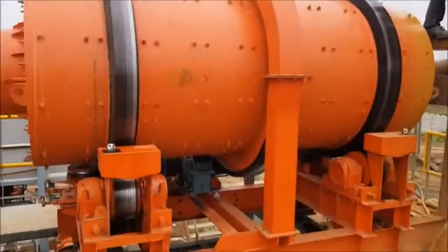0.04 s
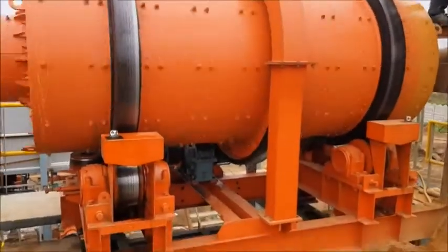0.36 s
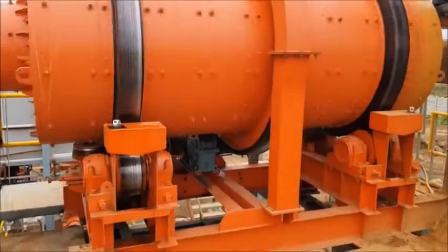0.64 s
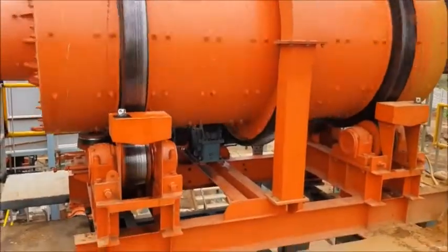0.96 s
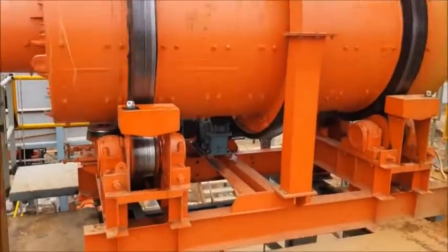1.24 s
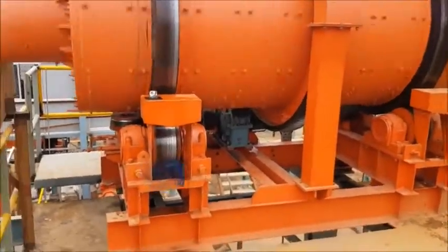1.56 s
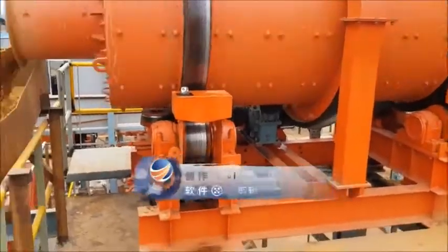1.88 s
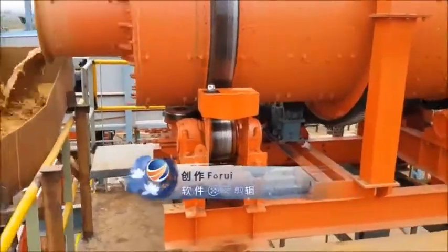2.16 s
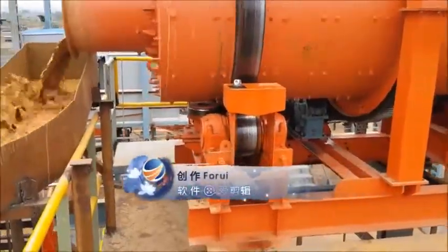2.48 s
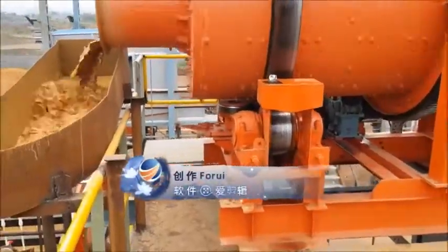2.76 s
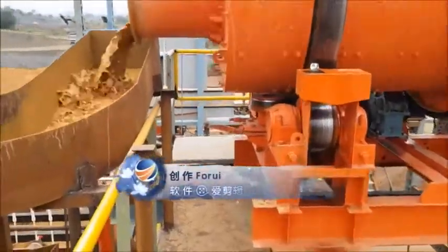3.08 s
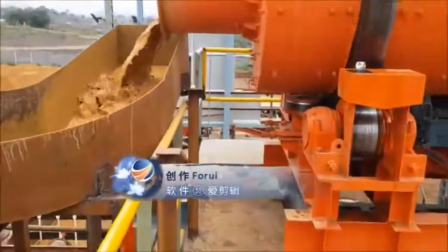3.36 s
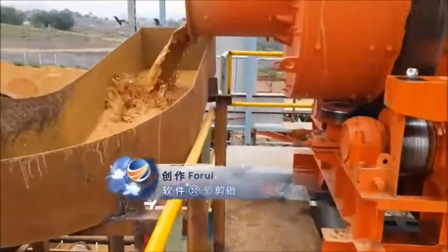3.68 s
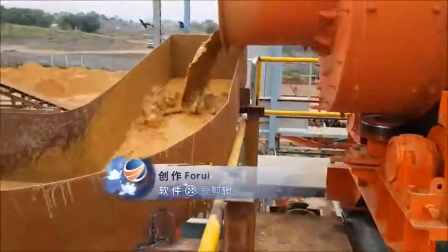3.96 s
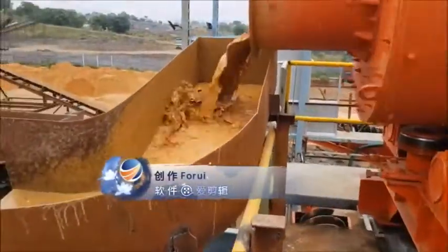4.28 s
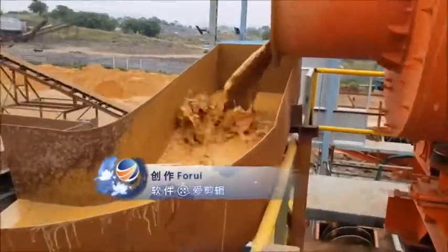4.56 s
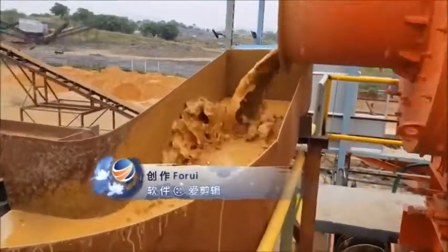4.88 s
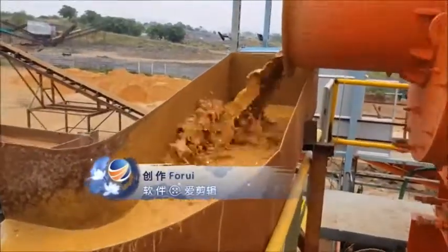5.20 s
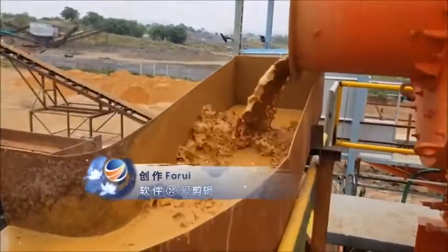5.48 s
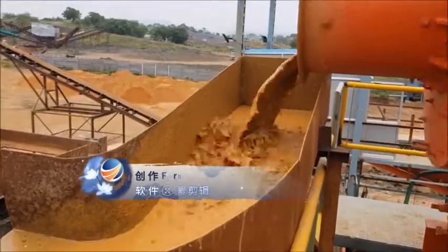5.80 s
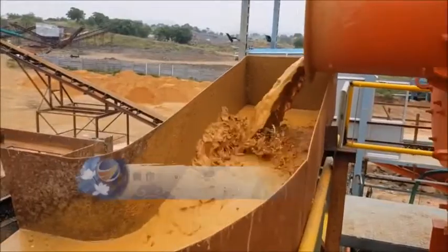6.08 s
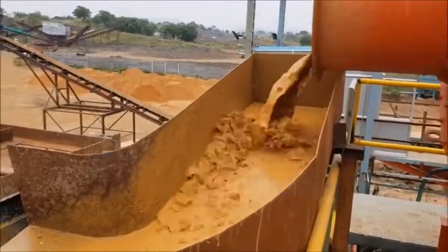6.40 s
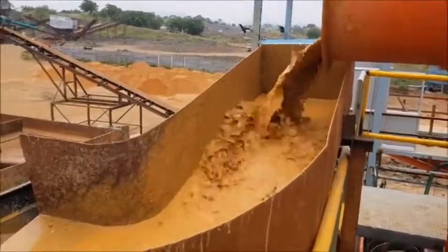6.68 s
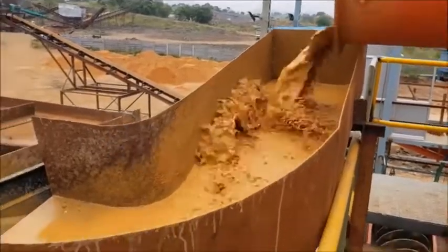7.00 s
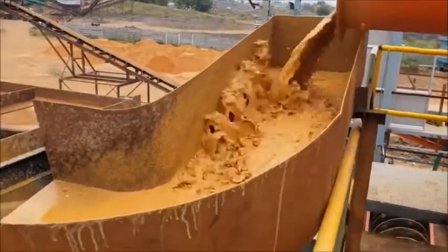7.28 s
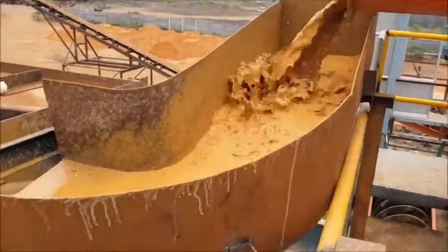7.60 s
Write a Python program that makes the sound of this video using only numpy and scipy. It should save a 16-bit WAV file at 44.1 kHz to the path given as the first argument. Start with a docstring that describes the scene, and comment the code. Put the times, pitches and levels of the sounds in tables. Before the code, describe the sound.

Outdoors at a mine, a nearby drum washer rumbles steadily as its load of stones rolls against the steel shell. Sharp knocks cluster in the first seconds, mixed with heavy thuds in clay, short showers of gravel and humming gear teeth. As the microphone turns from the machine to its outlet, the spatter and gulping slosh of pouring mud come up, while the dense roar carries on slightly to the right.

```python
"""A deep, lumpy roar with knocks: stones and wet clay tumbling in a big steel drum washer at a mine.
The load rings the shell; single stones thud in clay or strike bare steel; the ring gear's teeth hum.
Gravel slides and showers on the steel, mud sloshes, and slurry pours from the outlet into a trough.
Outdoors in light wind, the listener on a walkway turns from drum to trough: the splashing comes up."""
import sys
import numpy as np
from scipy import signal
from scipy.fft import rfft, irfft, next_fast_len
from scipy.io import wavfile
from scipy.ndimage import uniform_filter1d

SR = 44100
rng = np.random.default_rng(int(sys.argv[2]) if len(sys.argv) > 2 else 0)


def file_out(sig):
    """Save sig as 16-bit WAV at sys.argv[1]."""
    # one column per channel
    cols = np.atleast_2d(sig).T
    # limit, then scale
    lim = np.clip(cols, -1, 1)
    pcm = np.round(lim * 32767).astype(np.int16)
    wavfile.write(sys.argv[1], SR, pcm)


N = 346185
TIME_S = np.arange(N) / SR
MIC_LAG_S = 0.0005   # travel time between the two microphones


def from_db(db):
    """Decibels to gain."""
    return 10 ** (np.asarray(db) / 20)


def curves(rows):
    """One curve over time per column after t/s."""
    times_s, *columns = np.transpose(rows)
    return [np.interp(TIME_S, times_s, column) for column in columns]


def unit_rms(x):
    """Scale stereo to a mid rms of 1."""
    return x / np.sqrt(np.mean(x.mean(axis=0) ** 2) + 1e-20)


def evened(x, samples=5000):
    """Hold the running mid rms at 1."""
    power = uniform_filter1d(uniform_filter1d(x.mean(axis=0) ** 2, samples), samples // 2)
    return x / np.sqrt(np.maximum(power, 1e-20))


def drift(rate_hz):
    """Slow random wander, standard deviation 1."""
    r = np.exp(-80 * np.pi * rate_hz / SR)   # pole at SR / 40
    slow = signal.lfilter([1], [1, -2 * r, r * r], rng.standard_normal(N // 40 + 2002))[2000:]
    return np.interp(np.arange(N) / 40, np.arange(len(slow)), slow / slow.std())


def coloured(x, spectrum):
    """Filter by rows of f/Hz, level/dB; roll off past both ends."""
    size = next_fast_len(N)
    bins_hz = np.maximum(np.arange(size // 2 + 1) * SR / size, 1)
    hz, db = np.transpose(spectrum)
    gain = from_db(np.interp(np.log(bins_hz), np.log(hz), db))
    rolloff = np.minimum(1, hz[-1] / bins_hz) ** 2 * np.minimum(1, bins_hz / hz[0]) ** 2
    return irfft(rfft(x, size) * gain * rolloff, size)[:, :N]


def resonance(x, hz, width_hz):
    """Two-pole resonator, peak gain 1."""
    r = np.exp(-np.pi * width_hz / SR)
    feedback = [1, -2 * r * np.cos(2 * np.pi * hz / SR), r * r]
    return signal.lfilter(np.array([1, 0, -1]) * (1 - r * r) / 2, feedback, x + 1e-18)


def band(x, hz, width_hz):
    """Two equal resonators in series; rms 1."""
    return unit_rms(resonance(resonance(x, hz, width_hz), hz, width_hz))


def ringing(x, modes):
    """A body's modes in parallel; rms 1."""
    return unit_rms(sum(from_db(db) * resonance(x, hz, width_hz) for hz, width_hz, db in modes))


def flickering(x, depth_db, bins, frames):
    """Time-frequency patches swell and fade independently."""
    cells = signal.stft(x, nperseg=1024, noverlap=768)[2]
    patches = rng.standard_normal(cells.shape[1:])
    patches = uniform_filter1d(uniform_filter1d(patches, bins, axis=0), frames, axis=1)
    gain = from_db(depth_db * np.minimum(patches / patches.std(), 1.3))
    return signal.istft(cells * gain, nperseg=1024, noverlap=768)[1][:, :N]


def impacts(per_s, scatter_db, bearing=0, *, spread):
    """Random clicks of uneven size; each one's direction sets its lag between microphones."""
    chance, size, direction, sign = rng.random((4, N))
    at = np.flatnonzero(chance < per_s / SR)
    level_db = -scatter_db * np.log(np.maximum(size[at], np.exp(-5)))
    height = from_db(level_db) * np.sign(sign[at] - 0.5)
    side = np.clip(bearing + spread * (2 * direction - 1), -1, 1)[at]
    left_at = (at + np.round(side * MIC_LAG_S * SR).astype(int)) % N
    return np.array([np.bincount(left_at, height, N), np.bincount(at, height, N)])


def burst(t_s, rise_s, fall_s):
    """Envelope of one hit."""
    start = int(t_s * SR)
    age_s = TIME_S[:min(N - start, SR // 2)]
    out = np.zeros(N)
    out[start:start + len(age_s)] = (1 - np.exp(-age_s / rise_s)) * np.exp(-age_s / fall_s)
    return out


def note(t_s, hz, bearing, rise_s, fall_s):
    """A struck, decaying sine at both microphones."""
    start = int(t_s * SR)
    age_s = TIME_S[:min(N - start, SR // 3)]
    mics_s = np.array([age_s - bearing[start] * MIC_LAG_S, age_s])
    out = np.zeros((2, N))
    out[:, start:start + len(age_s)] = np.sin(2 * np.pi * (hz * mics_s + rng.random()))
    return out * burst(t_s, rise_s, fall_s)


# wind rumble: f/Hz, level/dB
WIND_SPECTRUM = [(15, -4), (60, 8), (110, 11), (250, -2), (800, -42.5)]


def wind():
    """Light gusts buffet each microphone."""
    level_db = -50 + 5 * drift(6.4)
    return from_db(level_db) * unit_rms(coloured(rng.standard_normal((2, N)), WIND_SPECTRUM))


# mud sloshing over: t/s, level/dB, length/s, f/Hz
SLOSHES = [(0.602, -34, 0.11, 820), (3.33, -30, 0.2, 785), (3.736, -35, 0.087, 800),
           (4.358, -25, 0.096, 500), (5.417, -22, 0.25, 519), (5.72, -29, 0.1, 840), (5.897, -34, .1, 810),
           (6.52, -26, 0.22, 630), (6.973, -28, 0.26, 564)]


def sloshes(bearing, gulps_per_s=45):
    """Mud swells and collapses; trapped air pockets gulp at a rising pitch."""
    churn, out = impacts(7000, 0.75, spread=0.45), np.zeros((2, N))
    for t_s, db, length_s, hz in SLOSHES:
        span = slice(int(t_s * SR), int((t_s + length_s) * SR))
        body = band(churn[:, span], hz, 0.44 * hz)
        out[:, span] += from_db(db) * body * np.sin(np.linspace(0, np.pi, body.shape[1]))
        for progress in rng.random(int(gulps_per_s * length_s)):
            gulp_hz = hz * (1 + 0.45 * (progress - 0.5)) * np.exp(0.2 * rng.standard_normal())
            gulp = note(t_s + progress * length_s, gulp_hz, bearing, rise_s=0.001, fall_s=0.0092)
            out += from_db(db + 4) * gulp
    return out


def slaps(per_band_per_s=11, fall_s=0.012):
    """Clots land with a brief spray of grit, each in its own band from 1.2 to 3 kHz; rms 1."""
    out, decay = 0, np.exp(-1 / (fall_s * SR))
    for hz in np.geomspace(1200, 3000, num=4):
        landings = (rng.random(N) < per_band_per_s / SR) * rng.uniform(0.28, 1, N)
        spray = signal.lfilter([1], [1, -decay], landings + 1e-18)
        grit = impacts(5400, 3.1, spread=0.89) * spray
        out = out + band(grit, hz, 1.42 * hz)
    return unit_rms(out)


# drops in the trough: f/Hz, level/dB
SPLASH_SPECTRUM = [(300, -10), (800, 10), (1600, 5.5), (2600, -6), (4200, 4.5), (7200, -3), (7800, -11),
                   (9400, -18.5)]


def slurry(level_db):
    """The stream hits the trough in gouts: drops spatter, bubbles ring, clots slap."""
    gouts = from_db(2.7 * drift(20))
    drops = coloured(impacts(6000 * gouts, 1.4, spread=0.99), SPLASH_SPECTRUM)
    spatter = unit_rms(flickering(drops, depth_db=25, bins=15, frames=3))
    bubbles = sum(resonance(impacts(14 * gouts, 2.3, spread=0.89), hz, hz / 45) / hz ** 1.3
                  for hz in np.geomspace(750, 6000, num=30))
    return (spatter + from_db(-4) * unit_rms(bubbles) + from_db(-5.5) * slaps()) * from_db(level_db)


# gravel on steel: f/Hz, level/dB
GRAVEL_SPECTRUM = [(400, -21.5), (800, -0.5), (1050, 0), (1350, 2), (1750, 3.5), (2150, 2.5), (2600, -1),
                   (3600, 0.5), (4500, -2.5), (5400, -4.5), (7400, -8), (7800, -19.5), (8800, -15.5),
                   (9600, -85)]


def gravel(level_db):
    """Countless wet grains slide over steel."""
    grains = coloured(impacts(25000, 1.8, spread=1.0), GRAVEL_SPECTRUM)
    sliding = evened(flickering(grains, depth_db=3.5, bins=5, frames=8))
    return sliding * from_db(level_db + 0.39 * drift(20))


# wet gravel landing: t/s, level/dB, f/Hz
SHOWERS = [(0.293, -7, 2020), (0.606, -3.5, 2300), (0.722, -5.5, 3600), (0.861, -3.5, 3500),
           (1.026, -11, 2600), (1.13, -5, 1800), (2.055, -8, 4200), (3.211, -7, 1900), (3.929, -6, 4500),
           (4.35, -13, 1900), (4.47, -8.5, 5200), (4.76, -8, 4000), (5.117, -7.5, 1750), (5.5, -6, 1700),
           (5.796, -6.5, 3900), (6.174, -8, 1750), (6.347, -7, 3400), (6.582, -6, 3600), (6.648, -7, 3800),
           (6.707, -8, 1750), (6.81, -14, 1700), (6.97, -6.5, 3820), (7.027, -8, 1750)]


def showers():
    """Each shower of gravel lands as a short clatter in its own band."""
    grains = coloured(impacts(9000, 0.86, spread=0.91), GRAVEL_SPECTRUM)
    out = np.zeros((2, N))
    for t_s, db, hz in SHOWERS:
        span = slice(int(t_s * SR), int(t_s * SR) + SR // 4)
        clatter = unit_rms(resonance(grains[:, span], hz, 0.95 * hz))
        out[:, span] += from_db(db - 15.5) * clatter * burst(t_s, rise_s=0.0019, fall_s=0.029)[span]
    return out


# gear overtones: multiple of tooth rate, level/dB
GEAR_OVERTONES = [(3, -7.5), (4, -2.5), (5, 3), (6, -5), (7, -10), (8, -7)]
# strain on the teeth: t/s, level/dB
GEAR_STRAIN = [(0, -30), (0.7, -27.5), (0.95, -37.5), (1.15, -22), (1.55, -36), (2.4, -29), (3.33, -24),
               (3.55, -28), (3.9, -31.5), (4.12, -20), (4.4, -26.5), (4.95, -27.5), (5.15, -22.5),
               (5.45, -22.5), (5.75, -32), (6.3, -29.5), (6.45, -18.5), (6.8, -31), (7.1, -21.5),
               (7.58, -34), (7.85, -22.5)]


def gear(bearing, tooth_hz=70.58, motor_hz=97.6):
    """Motor and meshing teeth hum; the strongest overtone follows the strain, the rest wander."""
    strain_db, = curves(GEAR_STRAIN)
    clock_s = TIME_S + np.cumsum(0.001323 * drift(1.274)) / SR
    mics_s = np.array([clock_s - bearing * MIC_LAG_S, clock_s])
    hum = from_db(-50.5 + 1.6 * drift(2.9)) * np.sin(2 * np.pi * motor_hz * mics_s)
    strongest_db = max(db for _, db in GEAR_OVERTONES)
    for multiple, db in GEAR_OVERTONES:
        level_db = strain_db if db == strongest_db else strain_db.mean() + 5 * drift(3.1)
        load_shake_db = 1.7 * drift(10)
        phase = 2 * np.pi * (multiple * tooth_hz * mics_s + rng.random()) + 0.47 * drift(6.1)
        hum += from_db(level_db + load_shake_db + db - 3.5) * np.sin(phase)
    return np.sqrt(2) * hum


# stones on bare steel: t/s, level/dB, f/Hz
STEEL_KNOCKS = [(0.097, -12.5, 555), (0.208, -10, 577), (0.608, -22, 3740), (0.62, -11, 615),
                (0.648, -17, 547), (0.824, -11, 587), (0.86, -15.5, 2900), (0.868, -14, 568),
                (1.03, -10.5, 2130), (1.064, -11, 568), (1.171, -17, 486), (1.279, -20, 3150),
                (1.392, -14, 568), (1.883, -11, 594), (2.008, -13, 620), (2.122, -14, 553),
                (2.262, -17.5, 590), (3.608, -18, 573), (3.715, -16, 531), (4.612, -14, 572),
                (6.562, -13, 475), (7.02, -19, 570)]


def steel_knocks(bearing):
    """A stone hits steel with a broad crack: wide plates bong, small stiff parts clack."""
    grit, out = impacts(9000, 0.78, spread=0.39), np.zeros((2, N))
    for t_s, db, hz in STEEL_KNOCKS:
        ring_s = 0.021 * (hz / 1000) ** -0.33
        out += from_db(db) * note(t_s, hz, bearing, rise_s=0.0034, fall_s=ring_s)
        span = slice(int(t_s * SR), int(t_s * SR) + SR // 4)
        crack = band(grit[:, span], hz, 0.85 * hz)
        out[:, span] += from_db(db - 8) * crack * burst(t_s, rise_s=0.0019, fall_s=0.0095)[span]
    return out


# big stones in clay: t/s, level/dB, f/Hz
CLAY_THUDS = [(0.138, -3.5, 319), (0.645, -3, 320), (1.166, -8, 325), (1.8, -4.5, 329), (2.269, -3, 268),
              (2.51, -6.5, 262), (2.729, -6, 318), (3.33, -4, 346), (3.731, -3.5, 294), (4.068, -3.5, 323),
              (4.168, -8, 337), (5.523, -5, 334), (6.492, -3, 330), (6.673, -7, 293), (6.957, -3.5, 293),
              (7.054, -5.5, 300)]


def clay_thuds(bearing, fall_s=0.022):
    """A heavy stone lands in clay with a dull thud and a hollow note."""
    blows = impacts(6600, 2.8, bearing, spread=0.26)
    dull = evened(resonance(resonance(blows, 410, 380), 370, 450), samples=800)
    out = np.zeros((2, N))
    for t_s, db, hz in CLAY_THUDS:
        out += from_db(db - 13) * dull * burst(t_s, rise_s=0.0031, fall_s=fall_s)
        out += from_db(db - 6) * note(t_s, hz, bearing, rise_s=0.0027, fall_s=fall_s)
    return out


# tumbling load: t/s, level/dB
LOAD = [(0, -22.5), (0.2, -19.5), (0.35, -22.5), (0.58, -19), (0.9, -20), (1.18, -18.5), (1.55, -21),
        (1.8, -20), (2.15, -21.5), (2.35, -20), (3.7, -19.5), (3.92, -21), (4.08, -20), (5.55, -19.5),
        (5.72, -21), (5.9, -18.5), (6.5, -19.5), (7.05, -20), (7.58, -22.5), (7.85, -19)]
# deep roar, brighter clatter: f/Hz, level/dB
ROAR_SPECTRUM = [(20, -29.5), (45, -30), (70, -16), (110, -12.5), (160, -9.5), (215, -3.5), (290, 1.1),
                 (360, -0.5), (450, -6.5), (600, -17.5), (1200, -44)]
CLATTER_SPECTRUM = [(250, -31.5), (400, -13.5), (490, 5), (580, 3.5), (700, 0), (850, -5.5), (1050, -14),
                    (2000, -41.5)]
# steel modes: f/Hz, width/Hz, level/dB
SHELL_MODES = [(245.1, 6.1, 2), (301.7, 3.7, -2.5), (330.4, 12, -7), (371, 6.8, -2), (434, 10, -4),
               (498, 13, -1.5), (664.6, 7.7, 2.5), (709, 26, -15), (732, 9.3, -3)]
PLATE_MODES = [(557, 23, -8.5), (572, 18, 0), (590, 6.9, 3)]


def drum(bearing, steel_db):
    """The load slumps in lumps on the shell: a deep roar, a brighter ring, the shell's modes."""
    load_db, = curves(LOAD)
    roar_db = load_db - 1.5
    ring_db = -21.5 + 0.58 * (load_db - load_db.mean()) + 0.21 * steel_db
    tumble = coloured(impacts(3000, 3.7, bearing, spread=0.85), ROAR_SPECTRUM)
    roar = evened(tumble, samples=3600) * from_db(roar_db)
    hits = impacts(2500, 4.53, bearing, spread=0.76)
    shell = evened(ringing(hits, SHELL_MODES), samples=9000) * from_db((roar_db + ring_db) / 2 - 7.5)
    plates = evened(ringing(hits, PLATE_MODES), samples=7000)
    rattle = impacts(4000, 4.2, bearing, spread=0.65)
    clatter = evened(coloured(rattle, CLATTER_SPECTRUM), samples=3000)
    plate_share = np.clip(from_db(2 * steel_db), 0, 0.9)   # falls as the listener turns away
    ring = (np.sqrt(plate_share) * plates + np.sqrt(1 - plate_share) * clatter) * from_db(ring_db - 2)
    lumps = from_db(0.57 * drift(12))
    return (roar + ring + shell) * lumps


# gravel and slurry flow: t/s, level/dB
FLOW = [(0, -24.5), (1.05, -24.5), (1.25, -25), (2.1, -24.5), (2.8, -25.5), (3.3, -24.5), (3.8, -25),
        (4.5, -24.5), (6.05, -25), (6.3, -24), (7.85, -25.5)]
# listener's turn: t/s, drum bearing (-1 left, 1 right), splash level/dB re flow, steel level/dB
TURN = [(0, -.2, -22, -4.5), (2.4, -0.078, -34, -5), (4, 0.52, -8.5, -5), (5.5, 0.38, -8, -16),
        (7.85, 0.51, -6.5, -16)]


def scene():
    """Wind, washer and outflow, heard by the turning listener."""
    bearing, splash_db, steel_db = curves(TURN)
    flow_db = curves(FLOW)[0] + 1.6
    air = wind()
    machine = drum(bearing, steel_db) + clay_thuds(bearing) + steel_knocks(bearing) + gear(bearing)
    return air + machine + gravel(flow_db) + showers() + slurry(flow_db + splash_db) + sloshes(bearing)


def record(dry, balance_db=0.21, ceiling=0.85, cutoff_hz=9600):
    """Left microphone slightly more sensitive; peaks rounded, top cut."""
    sound = dry * from_db([[balance_db], [-balance_db]])
    rounded = sound / (1 + (sound / ceiling) ** 6) ** (1 / 6)
    lowpass = signal.ellip(10, 0.1, 80, cutoff_hz, fs=SR, output="sos")
    return signal.sosfilt(lowpass, rounded)


dry = scene()
out = record(dry)
file_out(out)
```